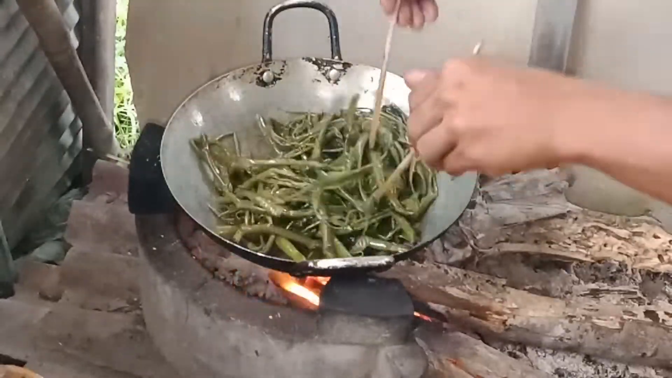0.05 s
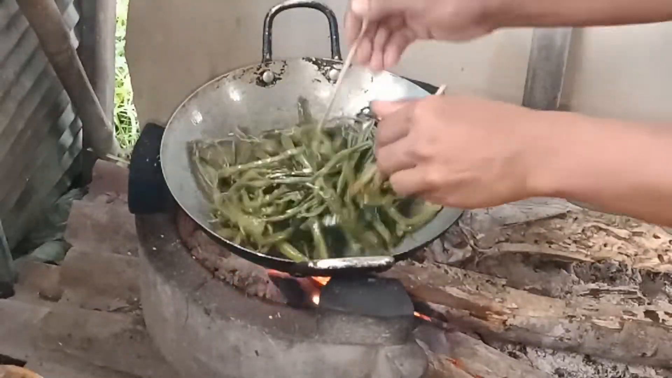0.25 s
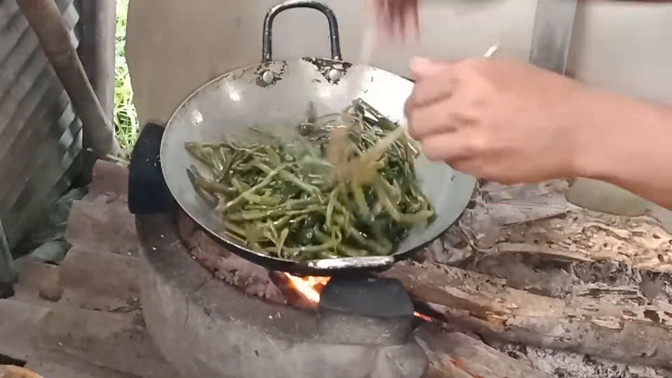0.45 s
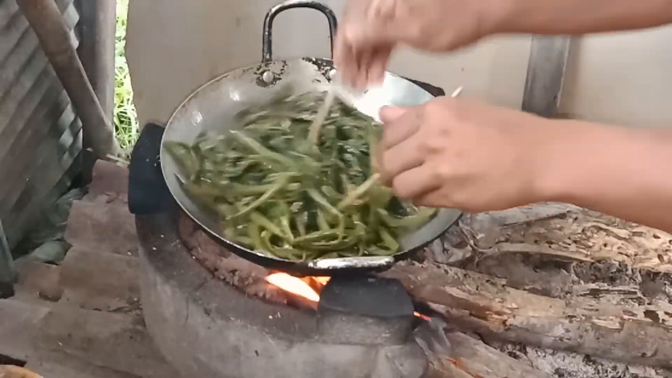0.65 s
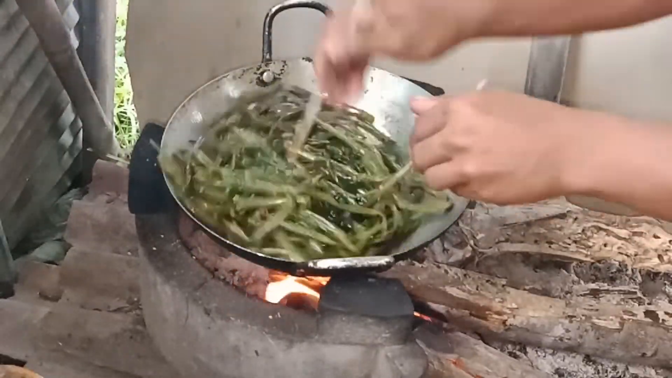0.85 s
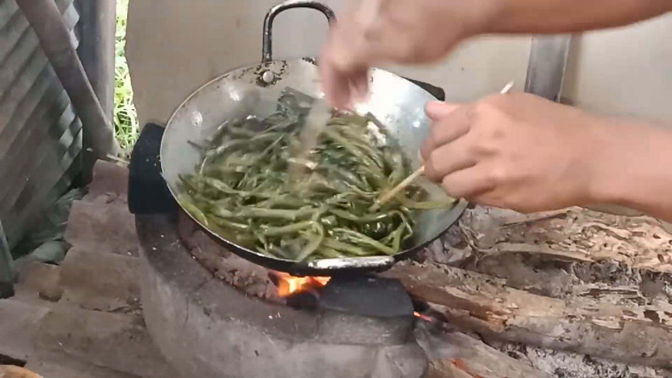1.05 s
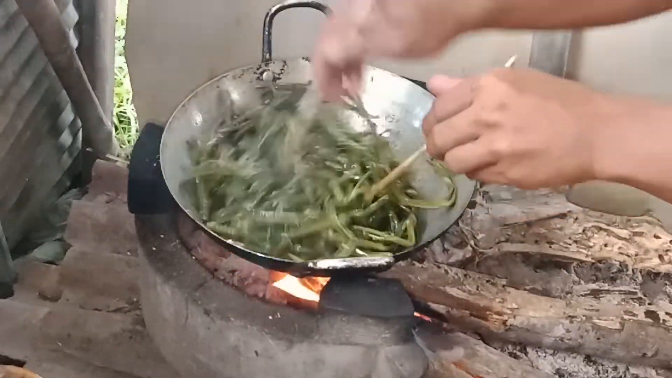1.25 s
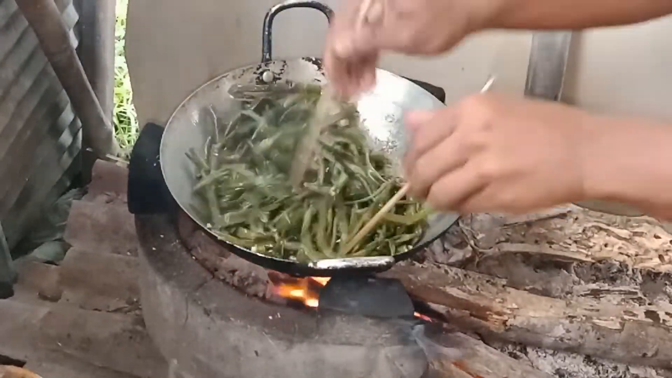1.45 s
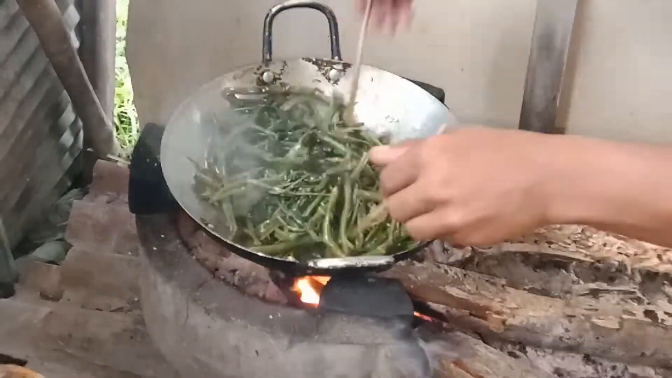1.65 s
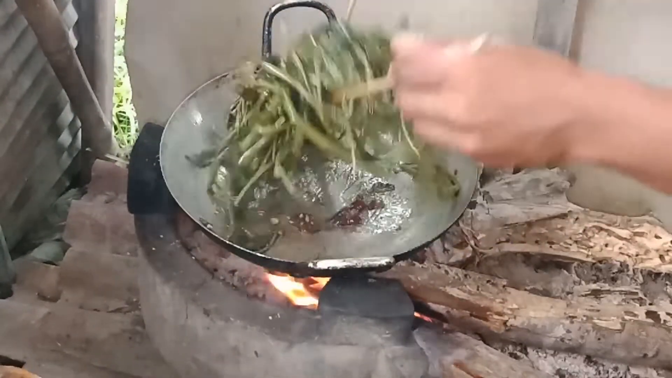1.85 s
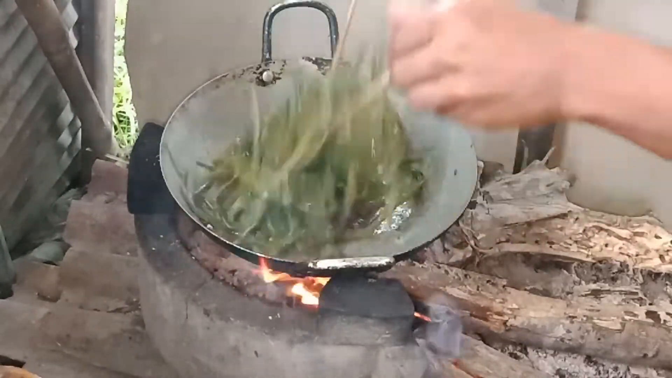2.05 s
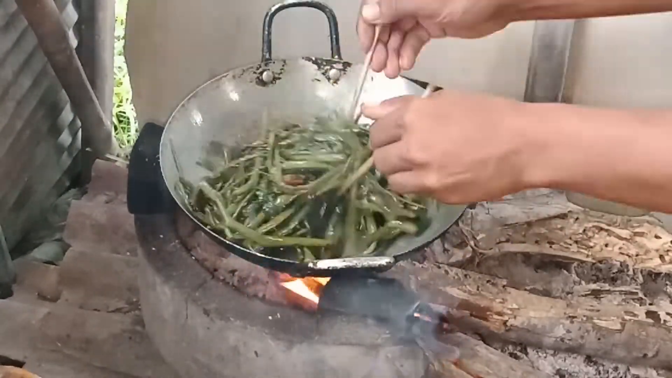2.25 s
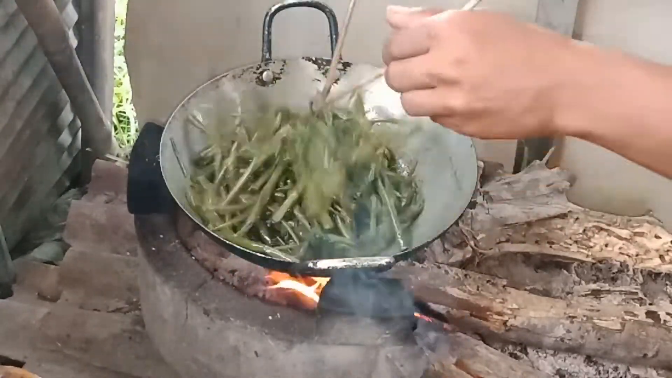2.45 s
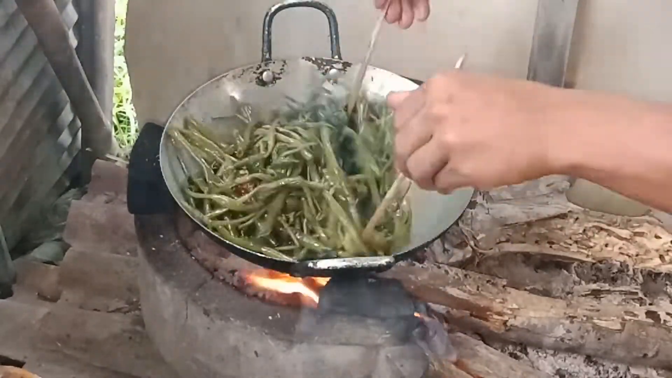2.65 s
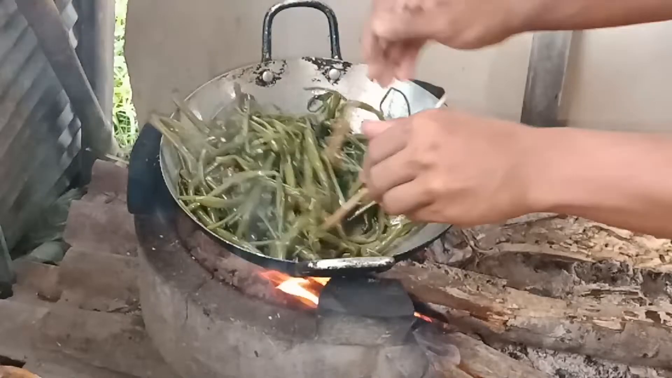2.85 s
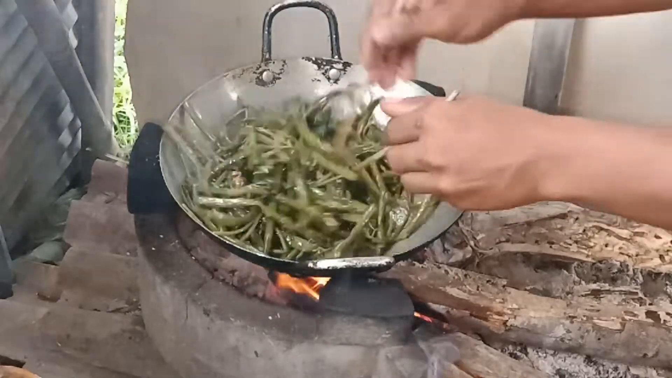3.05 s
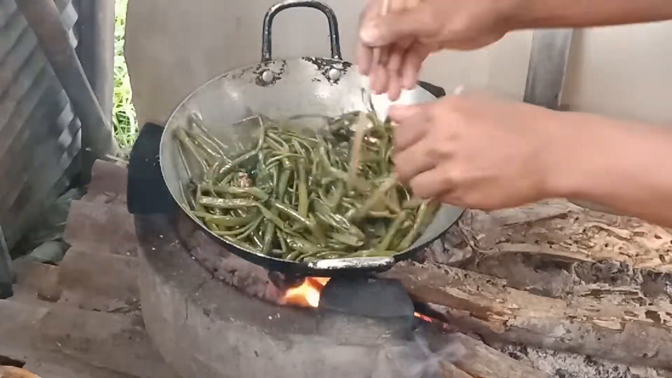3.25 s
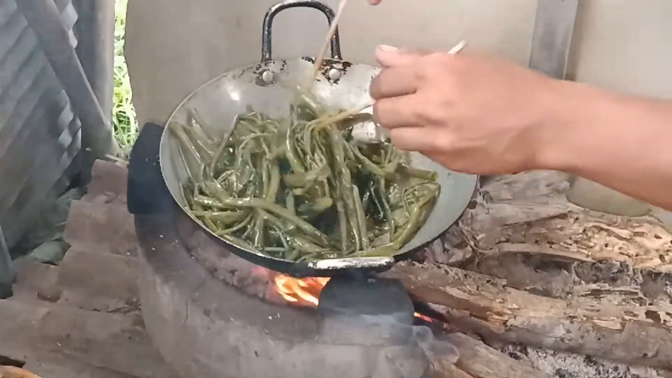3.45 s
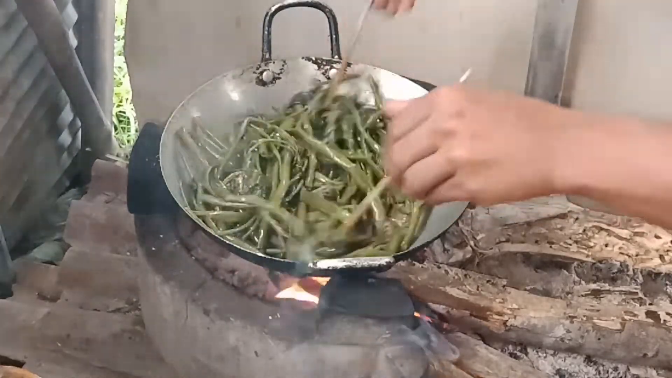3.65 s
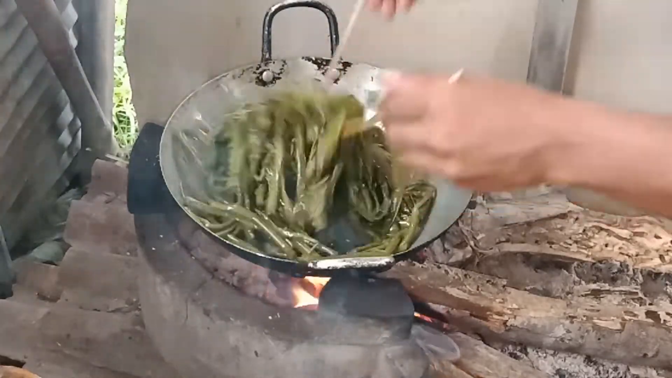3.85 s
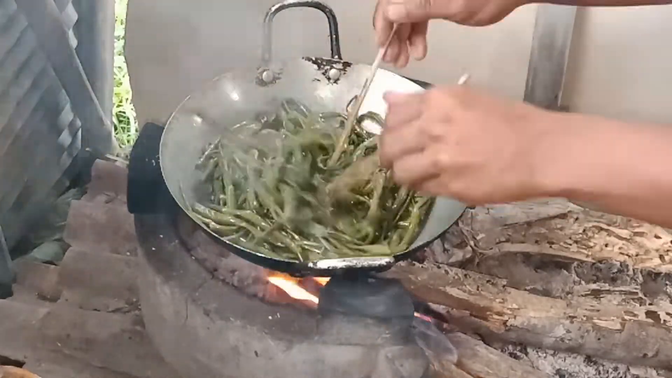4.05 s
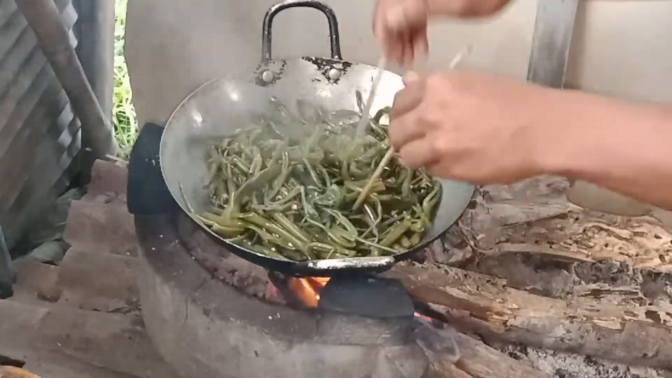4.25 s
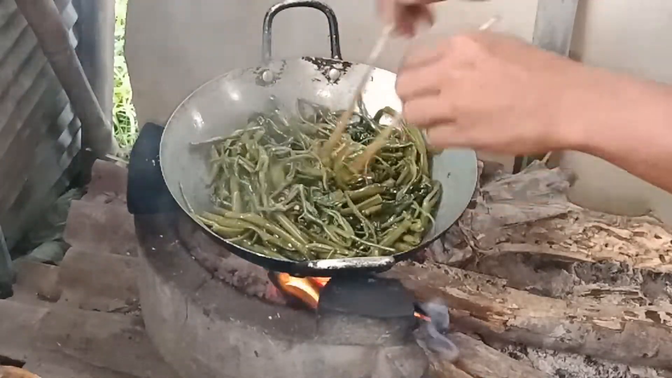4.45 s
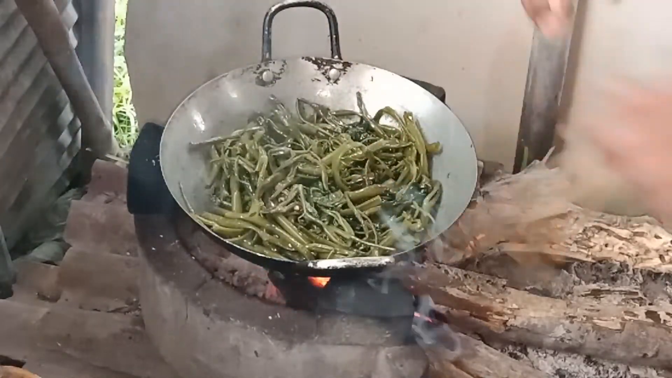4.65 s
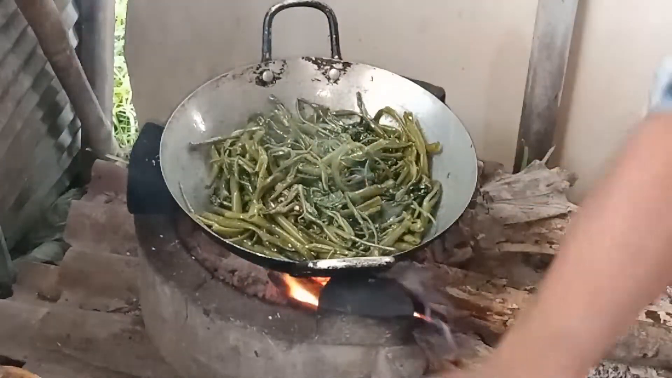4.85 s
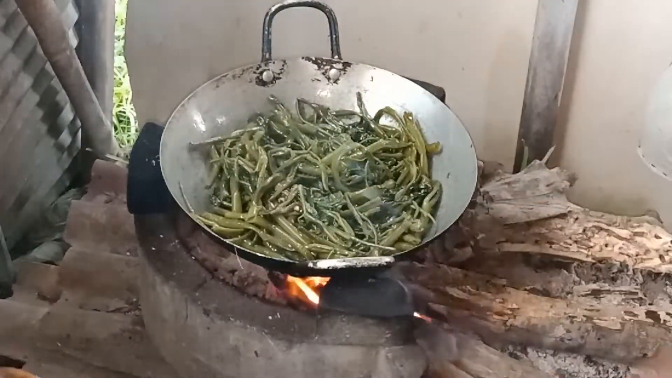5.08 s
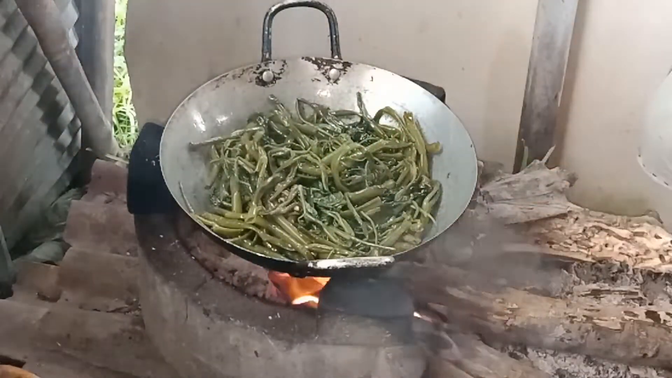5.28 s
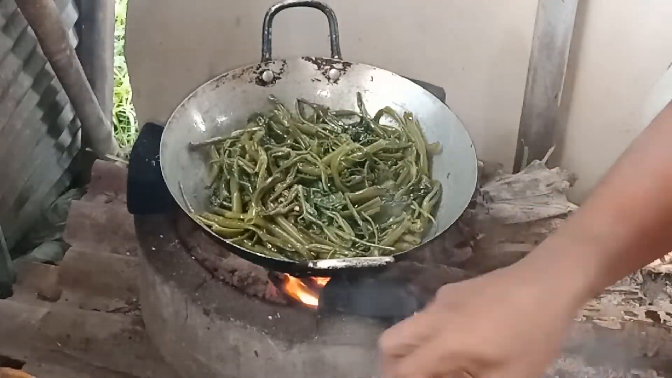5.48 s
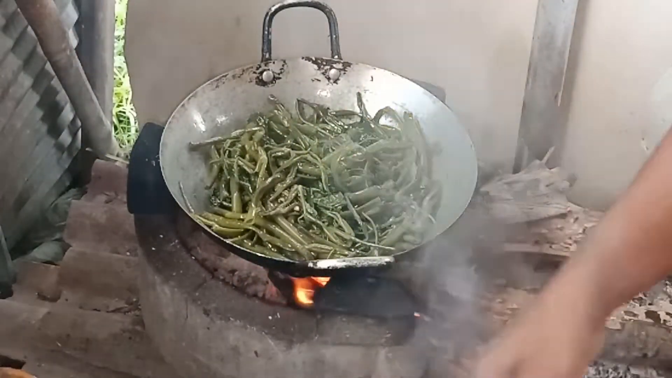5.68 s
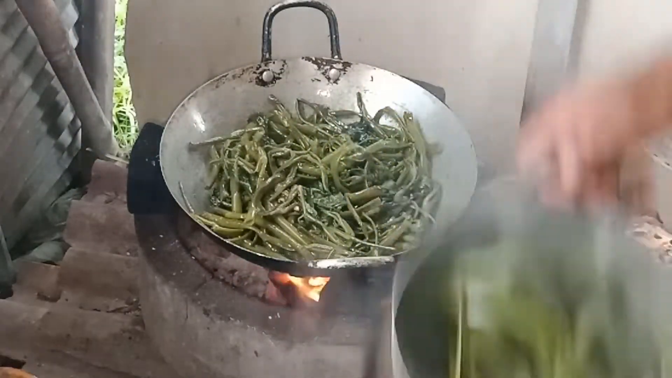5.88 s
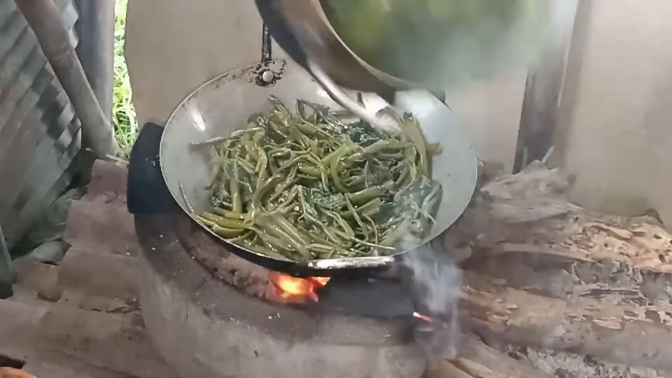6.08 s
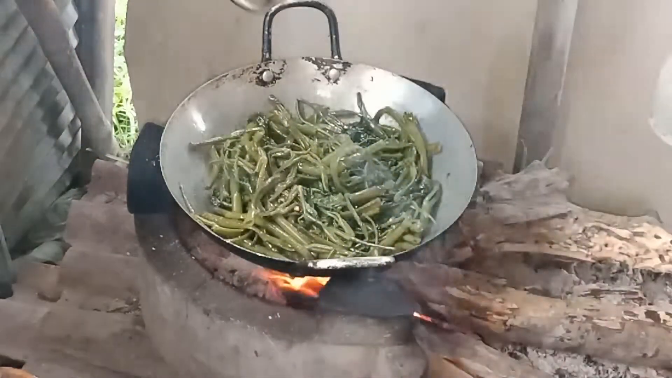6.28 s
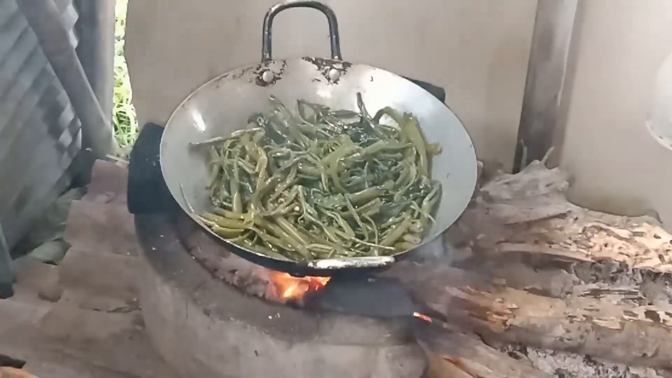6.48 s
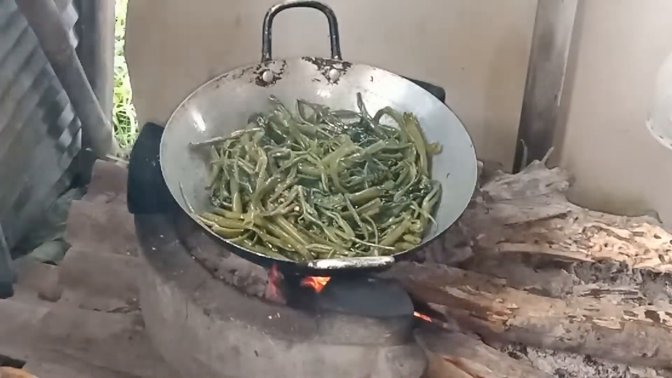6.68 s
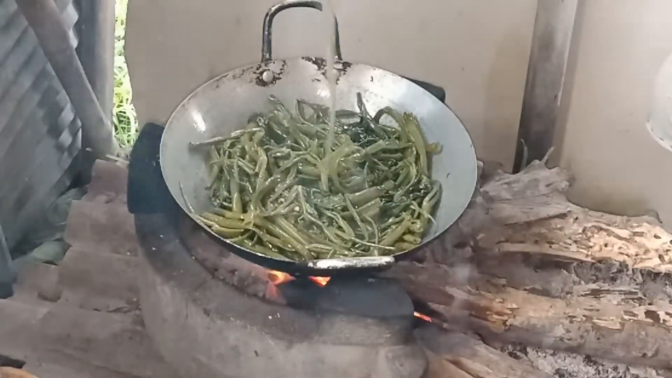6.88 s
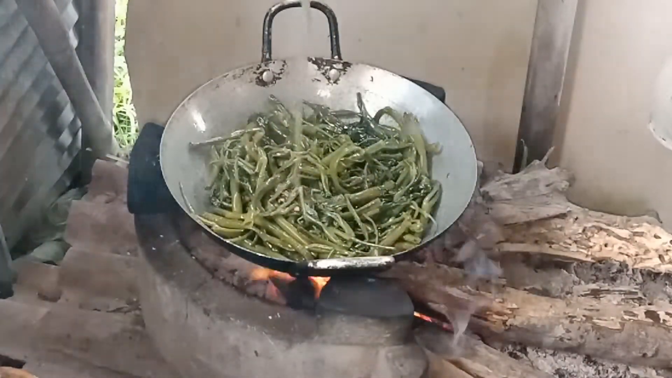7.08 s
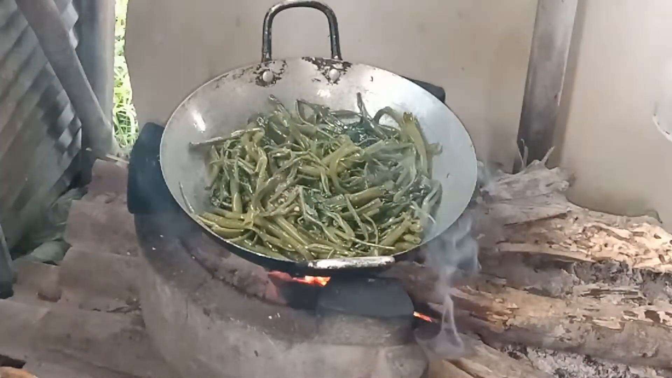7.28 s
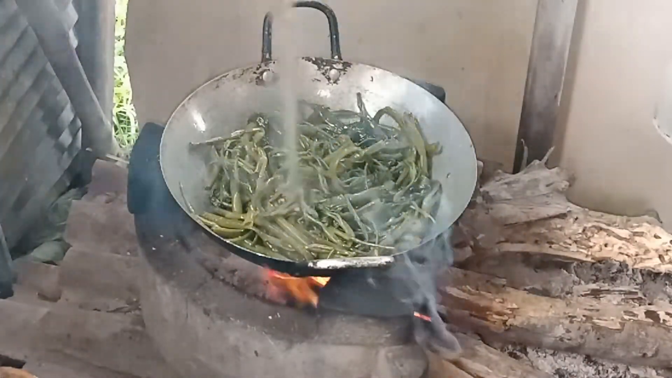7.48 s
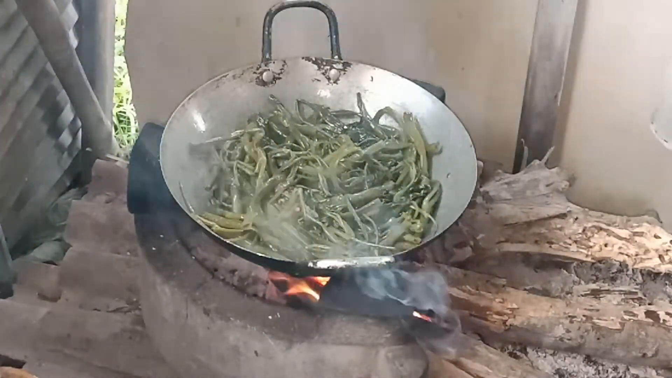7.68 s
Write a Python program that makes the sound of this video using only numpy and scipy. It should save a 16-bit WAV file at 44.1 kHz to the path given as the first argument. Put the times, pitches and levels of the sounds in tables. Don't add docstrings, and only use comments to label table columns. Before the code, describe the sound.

Greens sizzle steadily in an oily wok over a low wood fire, with a stick knock, a pot clanking down midway, then a burst of hissing steam.

```python
import sys
import numpy as np
from scipy import signal
from scipy.fft import rfft, irfft, next_fast_len
from scipy.io import wavfile
from scipy.ndimage import uniform_filter1d

SR = 44100
rng = np.random.default_rng(int(sys.argv[2]) if len(sys.argv) > 2 else 0)


def boost_factor(decibels):
    exponent = np.asarray(decibels, float) / 20
    return 10 ** exponent


def wav_record(signal):
    frames = np.transpose(np.atleast_2d(signal))
    bounded = np.clip(frames, -1, 1)
    quanta = np.round(bounded * 32767).astype(np.int16)
    wavfile.write(sys.argv[1], SR, quanta)


N = 340444

# pitch_hz, density_db_per_hz
HISS_LEFT = [(25, -100), (100, -94.5), (250, -91.5), (600, -97.5), (1500, -100), (3000, -102), (4100, -107),
             (5500, -114), (10000, -117), (15000, -118), (15500, -130)]
HISS_RIGHT = [(30, -105), (1000, -105), (5000, -114), (7000, -120.5), (10000, -120.5), (15000, -123.5),
              (15500, -134)]

# pitch_hz, density_db_per_hz
FIRE = [(25, -98), (60, -80.5), (110, -73), (150, -77), (220, -84), (400, -88), (700, -90), (1500, -115)]
# centre_s, level_db, width_s
FLARES = [
    (2.24, 3.5, 0.028),
    (6.6, 2, 0.02),
    (6.87, 5, 0.0098),
    (7.207, 7, 0.014),
    (7.4, 2.5, 0.027),
    (7.55, 6, 0.033),
    (7.66, 4.5, 0.054),
]

# pitch_hz, level_db, t60_s
TABLE_MODES = [(110, -6.5, 0.097), (173.4, 7, 0.049), (290, -12, 0.044), (395, -8.5, 0.077),
               (477, -20, .06)]
POT_MODES = [(817, -15, 0.12), (895, 6, 0.29), (1150, -4, 0.12), (1298, 0, 0.074), (1677, 0.5, 0.19),
             (1900, -20, 0.062), (2190, -13, 0.1), (2422, -8, 0.24), (2600, -15, 0.11), (3140, -23, 0.07),
             (3410, -15, 0.16), (4080, -26, .07), (4450, -19, 0.18), (4660, -17, 0.06), (5270, -23.5, 0.03)]
LID_MODES = [(440, -4, 0.076), (820, -18, 0.078), (1165, -8, 0.051), (1394, 3, 0.072), (1887, -8.5, 0.074),
             (2290, -16, 0.036), (2610, -14, 0.095), (3265, -19, 0.081), (3760, -33, .05)]
HANDLE_MODES = [(307, -10, 0.053), (643, -0.5, 0.05), (852, -9, 0.053), (1100, -6.5, 0.048),
                (1504, -13, .03), (2170, -9, 0.033), (2695, -14, 0.04)]
BOARD_MODES = [(225, -1.5, 0.078), (258, -1.5, 0.13), (297, 0.5, 0.11), (357, -9, 0.054), (417, -7, 0.078),
               (610, -7, 0.059), (761, -10, 0.045), (834, -13.5, 0.03), (1116, -9, 0.036)]
STICK_MODES = [(510, -9, 0.037), (844, -5.5, .015), (1125, -17.5, 0.0076), (1305, -2.5, 0.024),
               (1470, 1, 0.025), (1783, 3.5, 0.014), (2230, -4, 0.017), (2860, -1, 0.019),
               (3370, -1.5, 0.023), (4220, -15, 0.01)]

# start_s, peak_db, chatter_s, choke_s
TABLE_HITS = [
    (5.01, -53, .02, .04),
    (5.067, -29, .006, .04),
    (5.085, -38, 0.0059, .03),
    (5.115, -41, 0.013, .03),
    (5.158, -42, 0.0051, .03),
    (5.183, -44, 0.0066, .03),
    (5.554, -32.5, 0.0027, 0.033),
    (5.574, -41, 0.012, 0.051),
    (5.752, -55, .02, .05),
]
POT_HITS = [
    (5.316, -27, 0.002, 0.01),
    (5.3236, -17.5, 0.00096, 0.016),
    (5.337, -10, 0.0005, 0.012),
    (5.3459, -9.5, 0.0004, 0.034),
    (5.555, -22, 0.003, 0.015),
    (5.575, -24.5, 0.001, 0.019),
    (5.775, -39.5, .015, 0.019),
]
GRIPPED_HITS = [
    (5.358, -18, 0.0087, .025),
    (5.381, -16.5, .006, 0.02),
    (5.403, -24, .002, .007),
    (5.568, -29, .003, .01),
    (5.588, -27.5, .002, 0.011),
    (5.846, -51, .004, .02),
    (5.966, -42, 0.0089, 0.015),
]
LID_HITS = [
    (4.975, -34.5, 0.0006, 0.008),
    (4.988, -33, .001, .011),
    (4.997, -20.5, 0.0005, 0.009),
    (5.0043, -16.5, 0.0005, 0.029),
    (5.038, -30, 0.002, 0.0092),
    (5.223, -48, 0.0035, 0.022),
]
HANDLE_HITS = [
    (5.063, -27.5, .006, .02),
    (5.102, -26, 0.0036, .012),
    (5.155, -36, .01, .02),
    (5.560, -23.5, 0.015, 0.057),
    (5.678, -39.5, 0.01, 0.02),
    (5.696, -34, .005, 0.017),
    (5.709, -28, 0.0019, 0.028),
    (5.775, -44, .015, 0.018),
]
BOARD_HITS = [(4.944, -39.5, 0.011, 0.022), (4.967, -38.5, .005, .012), (4.995, -32, 0.0022, .006),
              (5.002, -21.5, 0.0027, 0.015), (5.021, -18.5, 0.0036, 0.021), (5.046, -26.5, .004, 0.02),
              (5.062, -21, 0.003, 0.0092), (5.071, -13.5, 0.002, 0.023), (5.086, -9.5, 0.0014, 0.022),
              (5.100, -15.5, 0.0021, 0.013), (5.112, -24.5, 0.0023, 0.017), (5.151, -25, 0.0033, 0.014),
              (5.164, -27, .002, 0.012), (5.182, -30, 0.003, 0.012), (5.203, -40, .004, .01),
              (5.216, -38, .003, .008), (5.231, -40, .003, .008), (5.326, -29.5, 0.0082, 0.026),
              (5.344, -32.5, 0.022, 0.098), (5.549, -29, 0.0018, .007), (5.556, -26, 0.002, 0.008),
              (5.561, -16, 0.0017, 0.014), (5.576, -22, 0.0043, 0.022), (5.605, -41, .003, .012),
              (5.675, -42, 0.01, 0.02), (5.692, -35, .005, .015), (5.711, -33.5, 0.0033, 0.013),
              (5.772, -41, .015, 0.032), (4.005, -47, .006, 0.022)]
STICK_HITS = [
    (3.5805, -18, 0.00046, 0.0027),
    (3.5845, -22, .002, 0.022),
    (3.261, -47, .002, .02),
    (3, -46, 0.0035, .02),
    (1.3, -42, .006, .03),
    (5.3462, -12, 0.00023, .003),
    (5.351, -20, .0003, .004),
    (7.355, -35, .001, .006),
    (7.206, -43, 0.00044, .005),
    (7.651, -49, 0.0041, .02),
]
# pitch_hz, density_db_per_hz
CLATTER = [(150, -29), (300, 1.5), (900, 4), (2000, 3), (3000, -2.5), (5000, -15.5), (7000, -40),
           (10000, -40), (14000, -70)]
# pitch_hz, gain_db
LEAK = [(100, -35), (200, -20), (330, -31.5), (430, -17.5), (520, -12), (650, -42), (900, -38), (1200, -45),
        (2500, -59.5), (5000, -65)]

# start_s, sizzle_db, juice_0_to_1
FRY = [(0.0, -47, 0.27), (0.64, -46, 0.24), (0.67, -41.5, 0.3), (1.0, -41.5, 0.13), (1.58, -41, 0.15),
       (1.82, -45, 0.22), (1.96, -51, 0.1), (2.12, -48, 0.17), (2.55, -46.5, 0.2), (2.97, -43.5, 0.26),
       (3.4, -47, 0.27), (3.95, -47.5, 0.21), (4.3, -46, 0.42), (4.9, -49.5, 0.32), (6.0, -48.5, 0.57),
       (7.02, -48, 0.66), (7.45, -44.5, 1.0), (7.62, -45, 0.66)]
# centre_s, level_db, width_s
STIRS = [(.26, 2.5, 0.05), (.4, -3, 0.07), (.7, 0.5, 0.033), (.82, -1, .04), (.95, 0.5, 0.044),
         (1.12, -.5, 0.06), (1.26, -2, 0.023), (1.35, 1, 0.051), (1.7, -0.5, 0.072), (2.04, -2.5, .03),
         (2.1, 1.5, 0.039), (2.25, 3.5, 0.05), (2.87, 1.5, 0.082), (3.13, 2, .04), (3.62, 4, 0.055),
         (3.78, 4, 0.055), (4.11, 2.5, 0.026), (4.23, 1, 0.068), (5.97, 1.5, 0.015), (6.17, -1.5, .02),
         (6.22, 2.5, 0.045), (6.98, 1.5, .03), (7.2, 1, 0.064), (7.38, 0.5, .04)]
# pitch_hz, width_hz, level_db over the sizzle
WOK = [(1050, 64, 6), (1262, 18, 8.5), (1545, 82, 5.5), (1786, 18, 7.5), (1900, 26, -0.5), (2507, 160, 4),
       (2680, 56, 4.5), (2860, 66, 4), (3067, 87, 5), (3470, 120, 2), (4340, 200, 1.5), (4730, 100, 1)]
# pitch_hz, density_db_per_hz
SIZZLE = [(500, -32), (900, -13.5), (1200, -6), (1500, -1.5), (2000, -1.5), (2600, -6), (4000, -51.5)]
# pitch_hz, density_db_per_hz
WOK_HUM = [(150, -29), (260, -10.5), (400, -9.5), (600, -10.5), (660, -10.5), (727, 5.5), (830, -6.5),
           (1200, -52)]
# pitch_hz, density_db_per_hz
FINE = [(1700, -13.5), (2700, -2), (3300, -2.5), (3800, -7.5), (4500, -10), (5300, -15.5), (6000, -23.5),
        (7200, -38.5), (8500, -58)]
# pitch_hz, density_db_per_hz
SPIT = [(4000, -29), (7000, 2), (10000, 4), (13000, 1), (14900, -7), (15300, -24)]
# pitch_hz, density_db_per_hz
SIMMER = [(150, -30.5), (500, -25), (800, -8), (1050, 0.5), (1300, -2), (1600, -8.5), (2500, -62)]
# pitch_hz, density_db_per_hz
FLASH = [(900, -29), (1500, -5.5), (2000, -5), (2700, -3), (3400, -9.5), (4300, -14), (7000, -34.5),
         (15000, -47)]

# pitch_hz, spread_db
PATCH_DEPTH = [(1500, 0.53), (3000, 2), (4500, 3), (7000, 3), (12000, 2.4)]

GRIP_HZ, GRIP_DB = 1000, -5.5
STICK_PUSH_S = 0.0003
SPLASH_S, SPLASH_RISE_S, SPLASH_DB = 7.643, 0.0083, -35.5
FLASH_SPREAD_DB = 0.8
FINE_DB, FINE_JUICE_DB = 2, -7.5
SPIT_DB, SPIT_JUICE_DB = -23.5, -32
HUM_DB, HUM_FOLLOWS = -6, 0.81
SETTLES_S, SETTLE_SPAN_S, SETTLED_DB = 5.82, 0.04, -6.5
PATCH_FRAME_SAMPLES, PATCH_LINES = 941, 3
THROB_HZ, THROB_DEPTH = 48000 / 1024, 0.11
CONVERTER_OFFSET = -0.0003


def colour(x, points, peaks=()):
    size = next_fast_len(len(x) + 8192)
    hz = np.arange(size // 2 + 1) * SR / size + 1
    points_hz, points_db = np.array(points).T
    db = np.interp(np.log(hz), np.log(points_hz), points_db)
    for centre_hz, width_hz, peak_db in peaks:
        db = db + peak_db / (1 + (2 * (hz - centre_hz) / width_hz) ** 2)
    cepstrum = irfft(db * np.log(10) / 20, size)
    cepstrum[1:size // 2] *= 2
    cepstrum[size // 2 + 1:] = 0
    response = np.exp(rfft(cepstrum))
    return irfft(rfft(x, size) * response, size)[:len(x)] * np.sqrt(SR / 2)


def unit(x):
    return x / np.sqrt(np.mean(x ** 2))


def walk(rate_hz):
    hold = int(SR / rate_hz)
    steps = np.repeat(rng.standard_normal(N // hold + 1), hold)
    return 0.77 * uniform_filter1d(uniform_filter1d(steps, hold), hold)[:N]


def swells_db(events):
    t = np.arange(N) / SR
    return sum(db * np.exp(-((t - centre_s) / width_s) ** 2) for centre_s, db, width_s in events)


def onset(start_s, span_s):
    t = np.arange(N) / SR
    return 1 / (1 + np.exp(np.clip((start_s - t) / span_s, -50, 50)))


def microphone_hiss():
    flutter_db = 1.1 * walk(30) + 0.3 * walk(4.9)
    return np.array([colour(rng.standard_normal(N), points) * boost_factor(flutter_db) for points in (HISS_LEFT, HISS_RIGHT)])


def flames():
    level_db = 2.3 * walk(9.6) + 0.58 * walk(13) + swells_db(FLARES)
    return colour(rng.standard_normal(N), FIRE) * boost_factor(level_db)


def struck(modes, hits, clatter_db, push_s):
    tail = 8192
    out, t = np.zeros(N + tail), np.arange(tail) / SR
    hz, db, t60_s = np.transpose(modes)[:, :, None]
    for start_s, peak_db, chatter_s, choke_s in hits:
        scatter_db, phase = rng.standard_normal((2, len(modes), 1))
        tones = np.sin(2 * np.pi * hz * t + 0.4 * phase) * 1000. ** (-t / t60_s)
        ring = np.sum(boost_factor(db + 0.9 * scatter_db) * tones, axis=0)
        clatter = unit(colour(rng.standard_normal(tail), CLATTER)) * np.exp(-t / 0.043)
        ring += boost_factor(clatter_db) * clatter
        ring *= 1 - np.exp(-t / push_s)
        touches = rng.standard_normal(2048) * (rng.random(2048) < 0.03)
        touches *= np.exp(-t[:2048] / max(chatter_s, 1e-4))
        touches[0] = 1.66
        blow = signal.fftconvolve(ring, touches)[:tail]
        blow = blow / (1 + np.exp((t - choke_s) / 0.0034))
        cutoff_hz = np.clip(16000 * boost_factor(0.5 * peak_db), 1500, 15000)
        blow = signal.sosfilt(signal.butter(2, cutoff_hz, fs=SR, output="sos"), blow)
        i = int(start_s * SR)
        out[i:i + tail] += boost_factor(peak_db + 2.0) * blow / np.abs(blow).max()
    return out[:N]


def table_thuds(metal):
    thuds = struck(TABLE_MODES, TABLE_HITS, clatter_db=-42, push_s=0.0078)
    return thuds + colour(metal, LEAK) / np.sqrt(SR / 2)


def pot_and_lid():
    gripped = [(hz, db + GRIP_DB * (hz < GRIP_HZ), t60_s) for hz, db, t60_s in POT_MODES]
    pot = struck(POT_MODES, POT_HITS, clatter_db=-6, push_s=0.0012)
    lid = struck(LID_MODES, LID_HITS, clatter_db=-11.5, push_s=0.0022)
    return pot + lid + struck(gripped, GRIPPED_HITS, clatter_db=-4.5, push_s=0.0012)


def pot_handle():
    return struck(HANDLE_MODES, HANDLE_HITS, clatter_db=-16.0, push_s=0.0018)


def board():
    return struck(BOARD_MODES, BOARD_HITS, clatter_db=-25.0, push_s=0.00075)


def stick():
    return struck(STICK_MODES, STICK_HITS, clatter_db=-13, push_s=STICK_PUSH_S)


def bursts(rate_hz, spread_db):
    happens = rng.random(N) < rate_hz / SR
    sign = rng.standard_normal(N)
    size = np.minimum(rng.exponential(size=N), 6)
    return unit(happens * sign * boost_factor(spread_db * size))


def frying():
    t = np.arange(N) / SR
    start_s, heat_db, juice = np.transpose(FRY)
    heat_db, juice = np.interp(t, start_s, heat_db), np.interp(t, start_s, juice)

    sizzle_db = heat_db + swells_db(STIRS)
    fine_db = FINE_DB + FINE_JUICE_DB * juice
    spit_db = SPIT_DB + SPIT_JUICE_DB * juice
    settled_db = SETTLED_DB * onset(SETTLES_S, SETTLE_SPAN_S)
    hum_db = HUM_DB + (HUM_FOLLOWS - 1) * (sizzle_db + 47.0) + settled_db
    simmer_db = -8.0 - 0.72 * fine_db - 0.15 * (sizzle_db + 48)
    seethe_db = 0.18 * walk(12) + 1.2 * walk(75)

    shared = 0.39 * bursts(1500, spread_db=2.0)
    large = unit(colour(shared + bursts(9000, spread_db=0.5), SIZZLE, WOK)) * boost_factor(0.24 * walk(26))
    hum = unit(colour(shared + bursts(3000, spread_db=1.5), WOK_HUM)) * boost_factor(hum_db + 1.0 * walk(8))
    fine = unit(colour(shared + bursts(12000, spread_db=-0.5), FINE, WOK)) * boost_factor(fine_db + 0.5 * walk(22))
    spit = unit(colour(0.4 * shared + bursts(6000, spread_db=0.5), SPIT)) * boost_factor(spit_db + 1.5 * walk(25))
    simmer = unit(colour(shared + bursts(4000, spread_db=2.5), SIMMER)) * boost_factor(simmer_db + 1.8 * walk(18))
    flash = unit(colour(bursts(14000, spread_db=FLASH_SPREAD_DB), FLASH, WOK))
    flash *= onset(SPLASH_S, SPLASH_RISE_S) * boost_factor(SPLASH_DB + seethe_db)
    return (large + simmer + hum + fine + spit) * boost_factor(sizzle_db + 0.5 + seethe_db) + flash


def scene():
    fire = flames()
    metal = pot_and_lid()
    knocks = metal + pot_handle() + stick() + board()
    knocks = signal.sosfilt(signal.butter(4, 185, "high", fs=SR, output="sos"), knocks)
    left = table_thuds(metal) + boost_factor(-13) * np.imag(signal.hilbert(fire))
    right = frying() + fire + knocks
    return np.array([left, right])


def uneven_lines(x):
    hop = PATCH_FRAME_SAMPLES
    window = np.sin(np.pi * (np.arange(2 * hop) + 0.5) / (2 * hop))
    hz, _, z = signal.stft(x, SR, window, 2 * hop, hop)
    spread_db = np.interp(hz, *np.transpose(PATCH_DEPTH))[:, None]
    chance = rng.standard_normal((2, len(hz) // PATCH_LINES + 1, z.shape[-1]))
    chance = np.repeat(chance, PATCH_LINES, axis=1)[:, :len(hz)]
    keep_db = -spread_db ** 2 * np.log(10) / 20
    patchy = signal.istft(z * boost_factor(spread_db * chance + keep_db), SR, window, 2 * hop, hop)[1][:, :N]
    return patchy * (1 + THROB_DEPTH * np.cos(2 * np.pi * THROB_HZ * np.arange(N) / SR))


def top_cut(x):
    return signal.sosfilt(signal.butter(12, 15480, fs=SR, output="sos"), x)


def record(dry):
    mix = uneven_lines(dry + microphone_hiss()) + CONVERTER_OFFSET
    return top_cut(mix)


dry = scene()
out = record(dry)
wav_record(out)
```